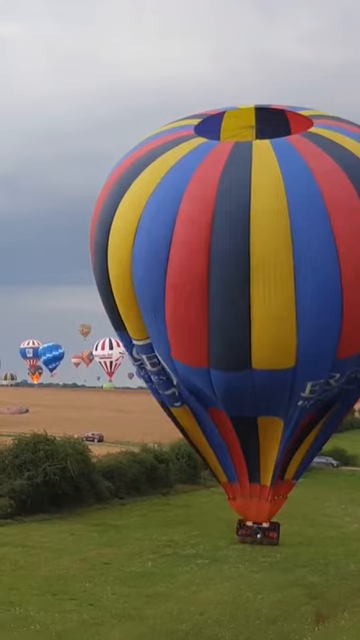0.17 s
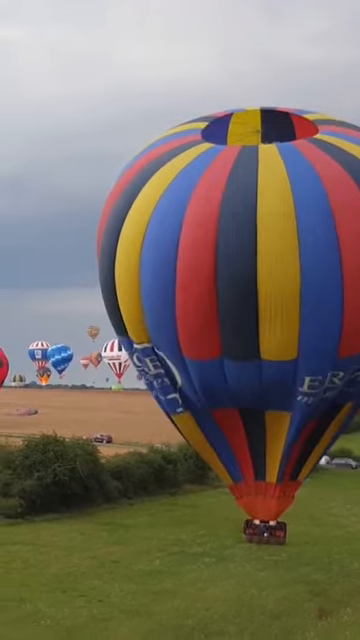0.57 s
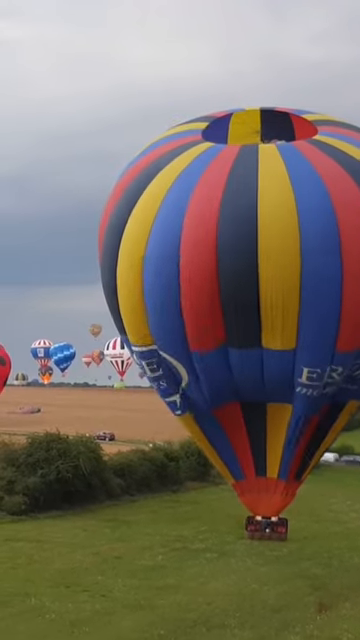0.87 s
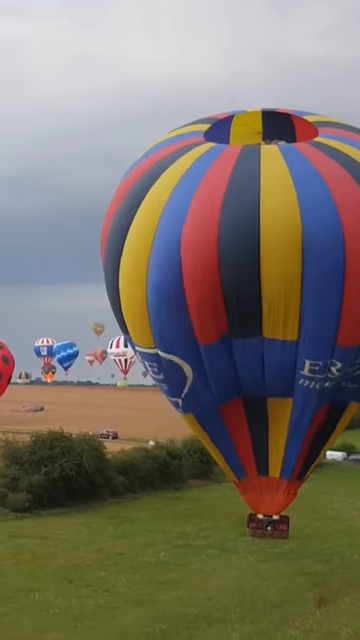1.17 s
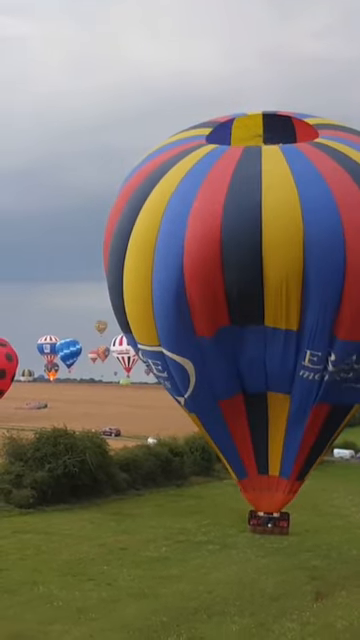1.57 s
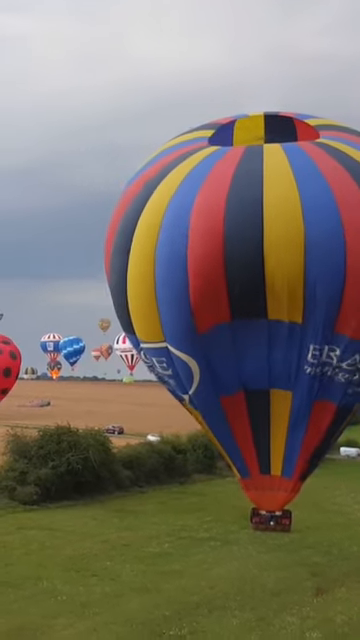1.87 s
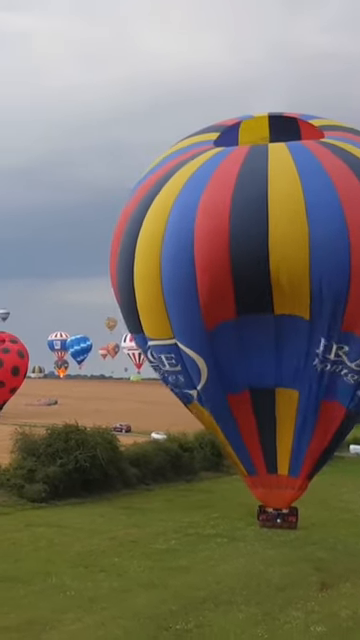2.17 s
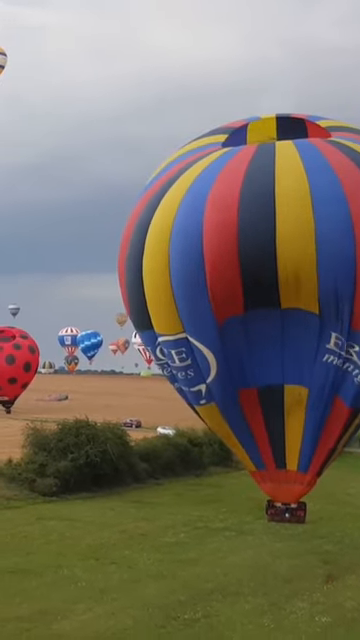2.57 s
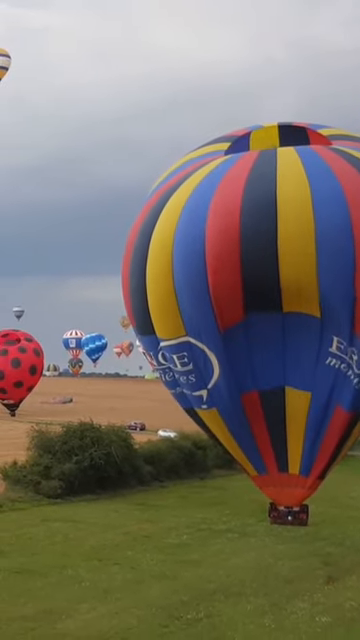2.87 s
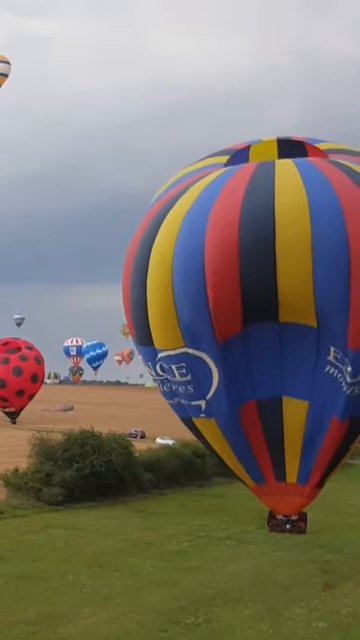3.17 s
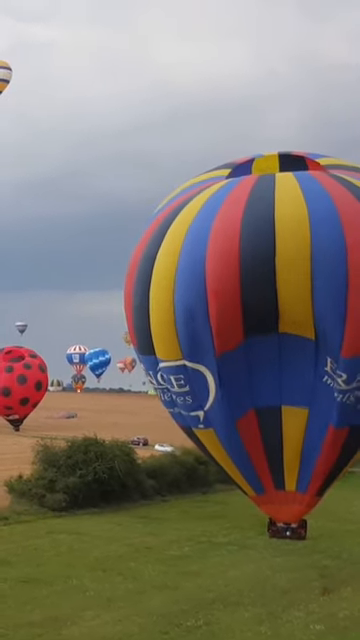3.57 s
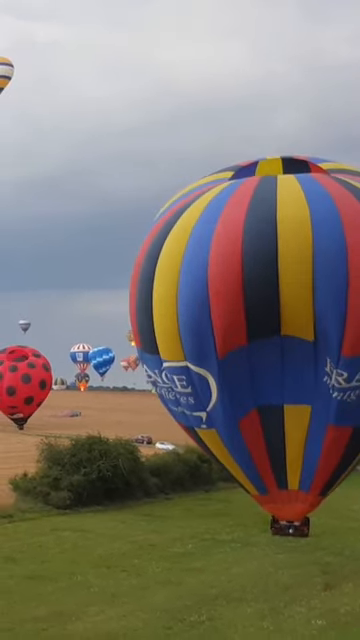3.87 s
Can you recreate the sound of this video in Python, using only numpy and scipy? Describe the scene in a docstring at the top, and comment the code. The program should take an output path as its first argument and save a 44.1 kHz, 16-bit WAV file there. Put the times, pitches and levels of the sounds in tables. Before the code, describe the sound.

A propane balloon burner roars and hisses very close and steadily, fades quickly as its valve closes, then a softer distant burner swells off to one side; open air, stereo microphone in the basket.

```python
"""In the basket of a hot-air balloon: the propane burner overhead roars and hisses, then its valve is closed.
The hiss dies first, the flame last. What remains is the softer roar of a burner further off to one side,
which swells and eases. Each burner is a sum of noise bands, shaped in spectrum, level and stereo spread;
close reflections from burner frame and basket ripple the result."""
import sys
import numpy as np
from scipy import signal
from scipy.fft import rfft, irfft, next_fast_len
from scipy.io import wavfile
from scipy.ndimage import uniform_filter1d, map_coordinates

SR = 44100
rng = np.random.default_rng(int(sys.argv[2]) if len(sys.argv) > 2 else 0)


def transcribe(signal):
    """Save signal, clipped to [-1, 1], as a 16-bit WAV file at the path in sys.argv[1]."""
    frames = np.atleast_2d(signal).T
    limited = np.clip(frames, -1, 1)
    pcm = np.round(limited * 32767).astype(np.int16)
    wavfile.write(sys.argv[1], SR, pcm)


N = 176400  # samples

# brief narrow flares of colour in both hisses: size, and rms depth
FLARE_HZ, FLARE_S, FLARE_DB = 260, .06, 1.9


def amp(db):
    """Level as a logarithm: decibels to amplitude gain."""
    return 10 ** (np.asarray(db) / 20)


def unit(x):
    """Equal power: scale to rms 1."""
    return x / np.sqrt(np.mean(x ** 2) + 1e-20)


def along(points, hz):
    """Logarithmic frequency scale: interpolate (frequency [Hz], value) points at hz."""
    f, v = np.transpose(points)
    return np.interp(np.log(hz + 1), np.log(f + 1), v)


def curves(rows):
    """Envelopes: one value per sample for each column after the time, end values held."""
    s, *columns = np.transpose(rows)
    return [np.interp(np.arange(N) / SR, s, column) for column in columns]


def wobble(rate):
    """Slow random modulation: a smooth curve through normal random knots, rate knots a second."""
    knots = rng.standard_normal(1024)
    return map_coordinates(knots, [np.arange(N) * rate / SR], mode="mirror")


def filtered(x, response):
    """Linear filtering: the spectrum of x times a complex response of frequency."""
    m = next_fast_len(N + SR // 2)
    return irfft(rfft(x, m) * response(np.fft.rfftfreq(m, 1 / SR)), m)[..., :N]


def turbulence(tone, alike, balance, lead_ms, patchy_db, patch=(600, .06)):
    """Turbulent flow as random noise: rms 1, patchy in gain, partly coherent at two microphones.

    patch is the (width [Hz], length [s]) of the patches, patchy_db their rms depth."""
    z = signal.stft(rng.standard_normal((2, N)), nperseg=512)[2]
    bins = round(patch[0] * 512 / SR)
    frames = round(patch[1] * SR / 256)
    field = uniform_filter1d(rng.standard_normal(z.shape[1:]), size=bins, axis=0)
    field = uniform_filter1d(field, size=frames, axis=1)
    pair = signal.istft(z * amp(patchy_db * unit(field)), nperseg=512)[1][:, :N]

    def mid_side(hz):
        # sharing power as cos and sin of half the angle sets the coherence to its cosine
        turn = np.arccos(np.clip(along(alike, hz), -1, 1)) / 2
        return amp(along(tone, hz)) * [np.cos(turn), np.sin(turn)]

    mid, side = filtered(pair, mid_side)
    half = np.array([[.5], [-.5]])  # left, right

    def ports(hz):
        lead_s = along(lead_ms, hz) / 1000
        gain = amp(half * along(balance, hz))
        gain = gain / np.linalg.norm(gain, axis=0)
        return gain * np.exp(2j * np.pi * hz * half * lead_s)

    return unit(filtered(np.array([mid + side, mid - side]), ports))


def near_burner():
    """Flow noise: flame roar, turbulent rush and jet hiss each scale as a power of the gas flow."""
    # envelopes of flame, rush and jet before their offsets below: (time [s], level [dB])
    flame_levels = [(0, -14), (.25, -12.5), (.8, -13), (1.3, -11.5), (1.5, -15), (1.8, -14.5), (2, -13),
                    (2.2, -11.5), (2.35, -14.5), (2.45, -13)]
    rush_levels = [(0, -11), (.55, -11.5), (1.05, -11.5), (1.6, -13.5), (2.05, -12.5), (2.35, -10.5)]
    jet_levels = [(0, -32), (.4, -33), (.85, -33.5), (1.05, -33), (1.2, -32.5), (1.35, -34), (1.82, -34.5),
                  (2, -33), (2.3, -35.5)]
    # gas flow as the valve is closed, with one sudden step: (time [s], flow [dB])
    valve_flow = [(2.36, 0), (2.47, -2.2), (2.525, -2.5), (2.555, -6), (2.61, -5.5), (2.69, -7.5),
                  (2.75, -11), (2.82, -16.5), (2.86, -20.5), (2.9, -42), (3, -83)]
    # spectra; the rush lies around 1 kHz: (frequency [Hz], relative level [dB])
    flame_tone = [(20, -37), (40, -13), (65, -7), (95, -3.5), (135, 0.9), (220, 0), (260, -1.2),
                  (310, 0.26), (410, -4.5), (500, -2.5), (630, -9), (790, -21), (1200, -44), (3000, -79.5)]
    rush_tone = [(400, -43), (790, -8), (1000, -0.5), (1120, 0), (1260, -6), (1400, -2.5), (1750, -10),
                 (2300, -12.5), (4000, -23.5), (9000, -60)]
    jet_tone = [(800, -18), (1750, -12), (1950, 5), (2170, -9), (2350, 1.5), (2550, 0.5), (2850, 0),
                (3070, -4.5), (3430, 1.4), (3800, -3), (4600, -6.5), (8000, -8), (10500, -11), (14000, -9)]
    # coherence of the two microphones: (frequency [Hz], likeness [-1 to 1])
    near_alike = [(250, .9995), (550, .99), (1100, .95), (2000, .62), (3600, .5), (4500, .08), (12000, .03)]
    # level difference: (frequency [Hz], left over right [dB])
    near_balance = [(160, 0), (270, -.7), (440, -2), (700, -2.7), (900, 0), (1210, -4), (1600, -1.5),
                    (2000, 3), (2500, 0), (3300, -3.5), (5400, -.5), (9000, 2.5), (14800, -.5)]
    # arrival difference: (frequency [Hz], lead of the left [ms])
    near_lead = [(300, .025), (750, .12), (1000, .05), (1500, .185), (2000, .185), (2400, .08), (3000, .12),
                 (8000, .11)]
    flame_offset_db, rush_offset_db, jet_offset_db = 1, -11, 8
    flame_power, rush_power, jet_power = .77, 1.22, 1.17  # exponents of the flow
    flame_flutter_db, rush_flutter_db = .3, .11
    sputter_db, quick_db, surge_db = .45, .5, .5  # unsteadiness of the jet

    (flame_db,), (rush_db,), (jet_db,) = curves(flame_levels), curves(rush_levels), curves(jet_levels)
    flow = amp(curves(valve_flow)[0])
    flutter = wobble(22.01)  # shared by all three layers
    place = near_alike, near_balance, near_lead

    flame_gain = amp(flame_offset_db + flame_db + flame_flutter_db * flutter) * flow ** flame_power
    flame = flame_gain * turbulence(flame_tone, *place, patchy_db=.5)

    rush_gain = amp(rush_offset_db + rush_db + rush_flutter_db * flutter) * flow ** rush_power
    rush = rush_gain * turbulence(rush_tone, *place, patchy_db=.85)

    unsteady_db = sputter_db * flutter + quick_db * wobble(140) + surge_db * wobble(12.1)
    jet_gain = amp(jet_offset_db + jet_db + unsteady_db) * flow ** jet_power
    jet = jet_gain * turbulence(jet_tone, *place, patchy_db=FLARE_DB, patch=(FLARE_HZ, FLARE_S))
    return flame + rush + jet


def far_burner():
    """Propagation through moving air: boom, duller roar and hiss from the side waver on their way."""
    # envelopes before the offsets below: (time [s], low boom [dB], roar [dB], hiss [dB])
    far_levels = [(2.9, -37, -42, -54), (3.03, -36.5, -43.5, -53), (3.15, -35, -40.5, -51.5),
                  (3.22, -34.5, -38, -48.5), (3.33, -30.5, -36.5, -45.5), (3.39, -26.5, -36, -44),
                  (3.47, -30.5, -34, -42), (3.56, -25.5, -35.5, -42), (3.64, -26, -31, -43.5),
                  (3.7, -34, -30, -45), (3.78, -23.5, -30.5, -44.5), (3.85, -32, -34, -44.5),
                  (4, -31.5, -35.5, -48)]
    # spectra: (frequency [Hz], relative level [dB])
    boom_tone = [(20, -30), (50, -13.5), (100, -5), (135, -6.5), (170, 0), (200, -3), (228, 0), (275, -10),
                 (400, -24), (900, -57)]
    roar_tone = [(150, -26.5), (290, 1), (400, 1), (520, -6.5), (690, -11.5), (790, -9), (1100, -23),
                 (2500, -54)]
    hiss_tone = [(400, -30), (1000, -1.5), (1120, -4), (1330, -1), (1750, -8), (2050, -2.5), (2230, 1.5),
                 (2450, -7), (2750, -10.5), (3150, -6), (3500, -6.5), (4650, -13.5), (5500, -12.5),
                 (6200, -17.5), (7000, -15.7), (7900, -19), (8650, -14.5), (9600, -24.5), (14500, -25)]
    # coherence of the two microphones: (frequency [Hz], likeness [-1 to 1])
    far_alike = [(100, 0.98), (400, 1), (600, 0.43), (2000, 0.38), (7000, 0.41), (10000, .12)]
    # level difference: (frequency [Hz], left over right [dB])
    far_balance = [(150, 0.3), (450, -3.5), (750, 1), (1150, -5), (1500, 1), (1950, -5), (2200, -8.5),
                   (3200, -7), (5000, -1.5), (7500, 3), (8500, 9), (12000, 9), (14500, 1)]
    # arrival difference: (frequency [Hz], lead of the left [ms])
    far_lead = [(150, .33), (700, .38), (2000, .5), (4000, .565)]
    boom_offset_db, roar_offset_db, hiss_offset_db = .5, .5, 4
    boom_waver_db, roar_waver_db, hiss_waver_db = .3, .42, .5

    boom_db, roar_db, hiss_db = curves(far_levels)
    place = far_alike, far_balance, far_lead
    waver = wobble(21.3)  # shared by boom and roar

    boom_gain = amp(boom_offset_db + boom_db + boom_waver_db * waver)
    boom = boom_gain * turbulence(boom_tone, *place, patchy_db=1.9)

    roar_gain = amp(roar_offset_db + roar_db + roar_waver_db * waver)
    roar = roar_gain * turbulence(roar_tone, *place, patchy_db=.5)

    hiss_gain = amp(hiss_offset_db + hiss_db + hiss_waver_db * wobble(25.03))
    hiss = hiss_gain * turbulence(hiss_tone, *place, patchy_db=FLARE_DB, patch=(FLARE_HZ, FLARE_S))
    return boom + roar + hiss


def basket(x):
    """Interference: weak reflections from burner frame and basket ripple the spectrum above the bass."""
    echo_db, latest_s, corner_hz = -15, .02, 600  # echo_db: summed level
    shape = (8, 2, 1)  # echoes, channels, frequencies
    delays = rng.uniform(latest_s / 5, latest_s, shape)
    signs = rng.choice([-1, 1], shape)

    def ripple(hz):
        echoes = (signs * np.exp(-2j * np.pi * hz * delays)).sum(axis=0) / np.sqrt(len(delays))
        above_bass = hz ** 2 / (hz ** 2 + corner_hz ** 2)
        return 1 + amp(echo_db) * echoes * above_bass

    return filtered(x, ripple)


def scene():
    """Superposition: both burners add, heard from the basket in open air."""
    return basket(near_burner() + far_burner())


def record(dry):
    """Saturation and band limiting: the highest peaks are rounded, then a sharp low-pass follows."""
    ceiling, top_hz = 1.0, 15450
    rounded = dry / (1 + np.abs(dry / ceiling) ** 8) ** (1 / 8)
    return filtered(rounded, lambda hz: hz < top_hz)


dry = scene()
out = record(dry)
transcribe(out)
```